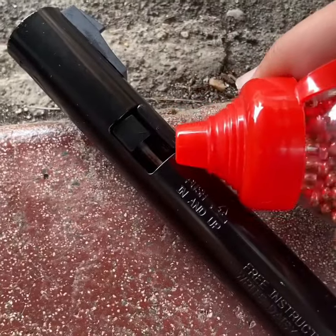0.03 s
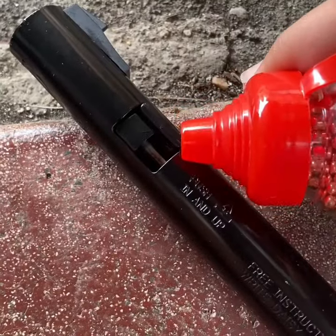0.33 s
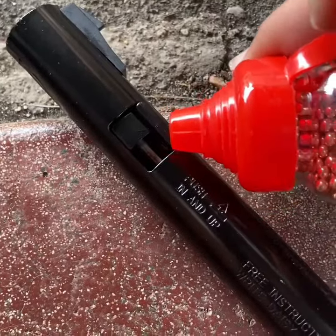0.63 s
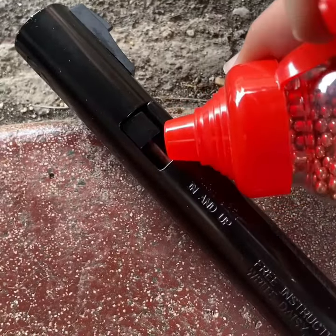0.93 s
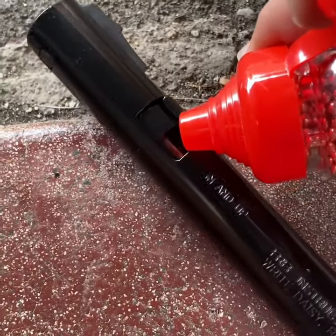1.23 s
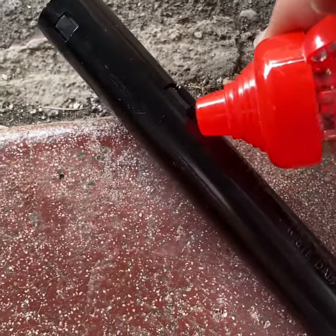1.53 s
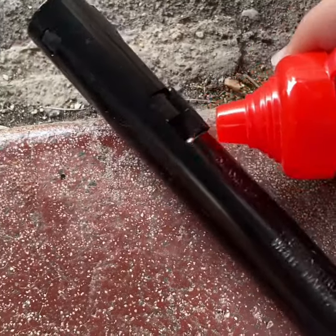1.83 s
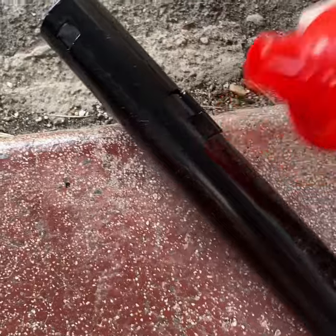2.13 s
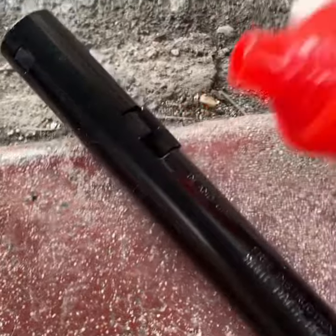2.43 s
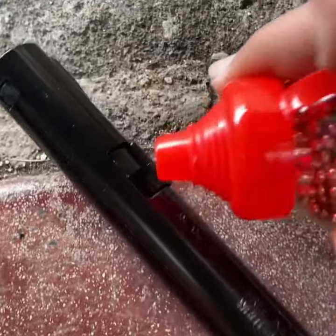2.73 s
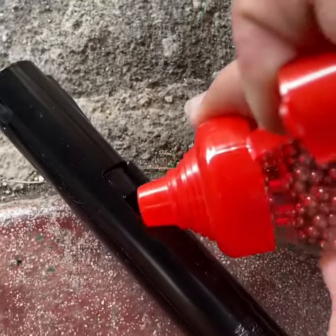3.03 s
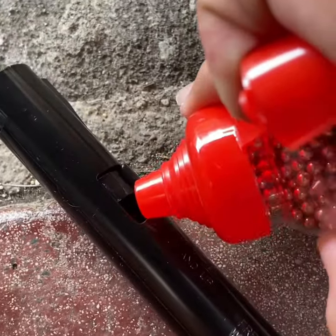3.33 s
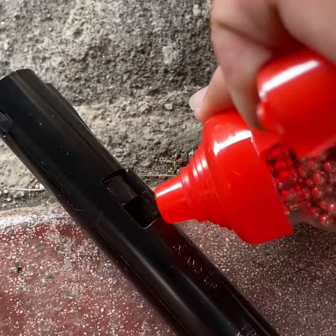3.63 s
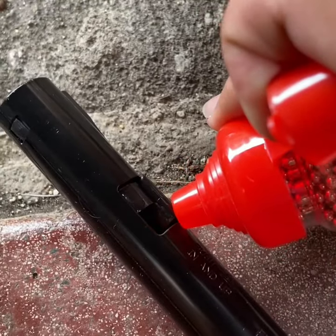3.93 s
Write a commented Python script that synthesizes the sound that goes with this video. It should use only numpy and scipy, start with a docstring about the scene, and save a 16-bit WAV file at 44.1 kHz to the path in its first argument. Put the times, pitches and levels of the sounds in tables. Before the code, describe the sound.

Steel pellets rattle close by from a plastic bottle into an air rifle, thinning to ticks by 0.6 seconds, then pouring again from 1.2 to 1.8. A pellet bounces on steel and the loading port clacks at 2 seconds. Pellets roll back inside the bottle until 2.5, pour from 2.7 to 3.4, then trickle. Underneath, a street rumbles low and a distant engine hums, slowing and fading after 3 seconds.

```python
"""A bright rattle of steel pellets, shaken from a plastic bottle into the loading port of an air rifle,
sounds close by over a low street rumble and a distant engine that hums and slows. Each collision is an
impulse, heard as a sharp tick, that excites a short ring of the bottle and the modes of the barrel tube.
Midway a pellet bounces on steel and the port clacks; then the pellets run again.
A phone's two microphones pick up the scene outdoors."""
import sys
import numpy as np
from scipy import signal
from scipy.fft import rfft, irfft
from scipy.io import wavfile
from scipy.ndimage import uniform_filter1d

SR = 44100
rng = np.random.default_rng(int(sys.argv[2]) if len(sys.argv) > 2 else 0)


def generate_wav(sig):
    """Save sig (samples, or channels by samples) to the path in sys.argv[1] as 16-bit PCM at SR."""
    pcm = np.round(np.clip(np.atleast_2d(sig).T, -1, 1) * 32767).astype(np.int16)
    wavfile.write(sys.argv[1], SR, pcm)


N = 176400
RING_SAMPLES = 4096
IMPACT_GAIN = np.sqrt(.0036 * SR)  # impact levels are energy spread over 3.6 ms


def undb(db):
    """Decibels to amplitude ratio."""
    return 10 ** (np.asarray(db) / 20)


def unit(x):
    """Normalisation to a mean energy of 1 per channel."""
    return x / np.sqrt(np.mean(np.sum(x ** 2, axis=-1)))


def pan(db):
    """Direction by level difference: left and right gains."""
    return undb(np.array([[db], [-db]]) / 2)


def drift(rate_hz):
    """Smoothed random fluctuation with a spread near 1."""
    step = int(SR / rate_hz)
    return uniform_filter1d(np.repeat(rng.standard_normal(N // step + 1), step), step)[:N]


def colour(spectrum, size, tilt_db=0, knee_hz=3580):
    """Spectral envelope: gain per frequency bin, sloped by tilt_db per octave above the knee."""
    f = np.maximum(np.fft.rfftfreq(size, 1 / SR), 1)
    hz, db = np.array(spectrum).T
    return undb(np.interp(np.log(f), np.log(hz), db) + tilt_db * np.log2(np.maximum(f, knee_hz) / 8000))


def noise(spectrum, channels=2):
    """Spectral shaping of white noise: uncorrelated channels of rms 1."""
    white = rng.standard_normal((channels, N))
    return unit(irfft(rfft(white) * colour(spectrum, N), N)) * np.sqrt(N)


def add(out, start_s, sound):
    """Superposition: a sound joins the mix at its start time."""
    start = max(int(start_s * SR), 0)
    part = out[:, start:start + sound.shape[1]]
    part += sound[:, :part.shape[1]]


def decay(t60_s):
    """Damping: an exponential fall of 60 dB in t60_s."""
    return np.exp(-np.log(1000) * np.arange(RING_SAMPLES) / SR / t60_s)


def ring(modes, detune=0.0029):
    """Free vibration: a sum of damped modes, each with its own phase at each microphone."""
    hz, db, t60_s = np.array(modes).T[:, :, None]
    hz = hz * (1 + detune * rng.standard_normal(hz.shape))
    cycles = hz * np.arange(RING_SAMPLES) / SR + rng.random((2, len(hz), 1))
    return unit(np.sum(undb(db) / np.sqrt(t60_s) * decay(t60_s) * np.sin(2 * np.pi * cycles), axis=1))


# phase lead of the left microphone for a collision: frequency_hz, phase_rad
MIC_LEAD = [(0, -2.5), (1200, -1), (2000, 0.07), (2700, -1.5), (4200, -4), (5200, -3), (8300, 0),
            (9500, 1.14), (11300, 0.5), (13000, 3), (14000, 8.5), (16000, 6.5)]


def collision(spectrum, tilt_db, t60_s=.0053, body_db=-4, bands=14):
    """Impulse response of an impact: a sharp pulse, a dense body ring and a faint return from the wall."""
    f = np.fft.rfftfreq(RING_SAMPLES, 1 / SR)
    jitter_s = .000006 * rng.standard_normal()
    lag_rad = np.interp(f, *np.array(MIC_LEAD).T) + 2 * np.pi * f * jitter_s
    body = undb(body_db) * unit(rng.standard_normal(RING_SAMPLES) * decay(t60_s))
    wall = undb(-13) * unit(rng.standard_normal((2, RING_SAMPLES)) * decay(t60_s=0.047))
    heard = (1 + rfft(body)) * np.exp(-1j * lag_rad * np.array([[0], [1]])) + rfft(wall)
    uneven_db = 3.5 * np.interp(f, np.linspace(0, SR / 2, bands), rng.standard_normal(bands))
    # a minimum-phase filter colours the pulse and keeps its onset sharp
    cepstrum = irfft(np.log(colour(spectrum, RING_SAMPLES, tilt_db) * undb(uneven_db)))
    half = RING_SAMPLES // 2
    minimum_phase = np.exp(rfft(2 * cepstrum[:half] * (np.arange(half) > 0), RING_SAMPLES))
    return unit(np.roll(irfft(heard * minimum_phase), 16, axis=1))


# spectra of a pellet collision and of pellets rolling back inside the bottle: frequency_hz, level_db
PELLET = [(300, -21), (1200, -26.5), (1950, -13), (2900, -13.5), (3950, 3.5), (4800, -5.5), (5250, -3.5),
          (6500, -1.5), (8800, -1), (9500, 1.5), (10600, -6.5), (11800, -9), (13500, -10), (15700, -13)]
IN_BOTTLE = [(300, -15), (1200, -21), (2000, -16), (3000, -5.5), (4100, 8), (5500, -21), (6800, -4.5),
             (8000, 1), (9600, 6), (11700, -10), (13800, -10), (15700, -28)]
# modes of the barrel tube: pitch_hz, level_db, t60_s
BARREL_MODES = [(1957, -3.5, 0.042), (2070, -5.5, 0.036), (2308, -7.5, 0.072), (3660, -4.5, 0.0092),
                (4760, -2.5, 0.018), (6500, -2.5, 0.072), (7420, -5, .05), (7470, -1, 0.06),
                (8460, 0, 0.087)]
# flow of each run of pellets: time_s, level_db
FIRST_POUR = [(0, -25), (0.05, -28.5), (0.11, -33.5), (0.18, -30), (0.22, -41), (0.27, -34.5), (0.36, -36),
              (0.41, -60), (0.5, -50), (0.66, -56)]
SECOND_POUR = [(1.1, -55.5), (1.22, -43), (1.3, -40), (1.36, -31), (1.46, -26), (1.58, -31), (1.69, -34),
               (1.76, -49), (1.84, -61)]
ROLL_BACK = [(2.05, -53), (2.12, -49.5), (2.17, -37), (2.3, -27.5), (2.4, -35.5), (2.49, -36), (2.55, -53)]
THIRD_POUR = [(2.6, -50), (2.8, -51.5), (2.88, -57), (2.96, -35), (3.04, -41), (3.1, -38), (3.2, -29),
              (3.3, -40.5), (3.4, -55)]
TRICKLE = [(3.45, -50), (3.6, -54), (3.69, -57), (3.76, -52), (3.88, -48), (3.95, -36.5), (4.0, -36)]
# runs of pellets: flow, spectrum, gain_db, tilt_db_per_octave, barrel_db, full_flow_hits_per_s
PELLET_RUNS = [(FIRST_POUR, PELLET, 0.69, -1.8, -6, 830), (SECOND_POUR, PELLET, 0.57, 0.43, -6, 980),
               (ROLL_BACK, IN_BOTTLE, 0.39, 0, -16, 2200), (THIRD_POUR, PELLET, -0.25, -2.7, -11.5, 1400),
               (TRICKLE, PELLET, -1.2, -1.5, -12, 2200)]


def pellet_rattle(flow, spectrum, gain_db, tilt_db, barrel_db, hits_per_s, full_flow_db=-24.5, kinds=20):
    """Shot noise: random collisions, denser and harder as the flow of pellets grows."""
    time_s, level_db = np.array(flow).T
    t = np.arange(time_s[0], time_s[-1], 1 / SR)
    flow_db = np.interp(t, time_s, level_db)
    chance = hits_per_s * undb(flow_db - full_flow_db) ** 0.54 / SR
    struck = rng.random(N)[:len(t)] < chance
    kind = rng.integers(0, kinds, N)[:len(t)]
    strength = undb(5.2 * np.minimum(rng.standard_normal(N)[:len(t)], 2))
    hits = struck * strength / np.sqrt(np.mean(strength ** 2) * chance) * undb(flow_db + gain_db)
    out = np.zeros((2, N))
    for k in range(kinds):
        tick = collision(spectrum, tilt_db + 0.53 * rng.standard_normal(), t60_s=.007, body_db=0)
        response = tick + undb(barrel_db) * ring(BARREL_MODES)
        add(out, time_s[0], signal.fftconvolve((hits * (kind == k))[None], response, axes=1))
    return out


# spectra of the street's rumble and of the hiss in the air: frequency_hz, density_db
RUMBLE_SPECTRUM = [(20, -52), (33, -33), (44, -6), (54, 2), (72, -10), (100, -1.5), (150, -11.5), (230, -9),
                   (310, -17.5), (450, -24), (700, -37), (1500, -81)]
AIR_SPECTRUM = [(100, -10), (400, 8.5), (700, 3.5), (1000, 5), (1500, -1), (2500, -6), (4500, -17),
                (8000, -18), (15000, -30)]
# envelope of the rumble: time_s, level_db
RUMBLE_ENVELOPE = [(0, -31.5), (.5, -33.5), (1.15, -34), (1.299, -30.5), (1.45, -35), (2.4, -36.5),
                   (3.3, -36), (3.6, -37.5), (4, -36.5)]


def street(drone_hz=54.58, air_width=0.94):
    """Coherence sets width: rumble and a wavering drone reach both sides in phase; the hiss is diffuse."""
    mid, side = noise(AIR_SPECTRUM)
    air = (mid + air_width * side * np.array([[1], [-1]])) * pan(db=1)
    wavering_hz = drone_hz * (1 + 0.063 * drift(rate_hz=13))
    drone = np.sqrt(2) * np.sin(2 * np.pi * np.cumsum(wavering_hz) / SR)
    rumble_db = np.interp(np.arange(N) / SR, *np.array(RUMBLE_ENVELOPE).T)
    rumble = undb(rumble_db) * noise(RUMBLE_SPECTRUM, channels=1)
    return (rumble + undb(-46.5) * drone) * pan(db=3) + undb(-50) * air


# the engine's firing rate and its harmonics: time_s, firing_hz, second_db, third_db, fourth_db
ENGINE_HARMONICS = [(0.0, 80.85, -50, -29, -58), (0.272, 87.5, -50, -32.5, -51),
                    (0.55, 71.05, -29.5, -26.5, -51), (0.71, 68.06, -27.5, -51.5, -42.5),
                    (0.95, 66.05, -27, -35.5, -38.5), (1.05, 65.1, -23, -49.5, -37.5),
                    (1.171, 66.8, -24.5, -48.5, -50.5), (1.2, 66.76, -28, -48, -34),
                    (1.38, 68.5, -23, -37, -39.5), (1.58, 67.55, -23, -39, -47),
                    (1.81, 67.05, -25, -64, -57), (1.87, 64.92, -25.5, -70, -57),
                    (1.94, 65.53, -33, -39, -40.5), (2.132, 65.22, -31, -46, -44),
                    (2.34, 61.95, -41.5, -47, -36), (2.41, 64.3, -27.5, -44, -61),
                    (2.64, 62.56, -25.5, -39, -33.5), (2.928, 64.58, -30, -72, -42),
                    (3.12, 59.8, -26.5, -44, -40), (3.21, 55.2, -33, -42, -38.5),
                    (3.3, 53.9, -44, -53, -43)]


def distant_engine(waver=.006, flutter_db=1.92, fade_s=0.32):
    """Periodic firing makes a harmonic series; only its low end carries this far, slowing and fading."""
    t = np.arange(N) / SR
    time_s, *columns = np.array(ENGINE_HARMONICS).T
    firing_hz, second_db, third_db, fourth_db = (np.interp(t, time_s, column) for column in columns)
    phase = 2 * np.pi * np.cumsum(firing_hz * (1 + waver * drift(rate_hz=15))) / SR
    hum = np.zeros(N)
    for harmonic, db in [(2, second_db), (3, third_db), (4, fourth_db), (1, -45), (6, second_db - 30.5)]:
        amplitude = np.sqrt(2) * undb(db + flutter_db * drift(rate_hz=20))
        hum += amplitude * np.sin(harmonic * phase + 2 * np.pi * rng.random())
    fade_out = np.exp(-np.maximum(t - time_s[-1], 0) / fade_s)
    return undb(-0.2) * hum * fade_out * pan(db=2.2)


# single pellet impacts that stand out of the rattle: start_s, level_db, tilt_db_per_octave
PELLET_IMPACTS = [(0.0187, -19, 2), (0.055, -21, 1), (0.1285, -22.5, -12), (0.1378, -14.5, 3),
                  (0.163, -18, -5.5), (0.181, -21.5, 0), (0.1857, -22, -4), (0.2355, -24.5, -3),
                  (0.253, -23, -7), (0.2684, -23.5, -3), (0.2914, -30, -6), (0.3084, -25, -5),
                  (0.3177, -22.5, -6), (0.326, -25, -5), (0.3327, -27, -5), (0.345, -27, -2),
                  (0.358, -36, -4), (0.3719, -30, -6), (0.4334, -36, -8), (0.46, -31.5, -5),
                  (0.4734, -28, -2), (0.4864, -23, 1), (0.497, -32, -3), (0.507, -29, -4),
                  (0.515, -25.5, -1), (0.5685, -22.5, 2), (0.5717, -27, 4), (0.5859, -31.5, -5),
                  (0.613, -48, -8), (0.6253, -33.5, -10), (0.9013, -38, -1), (1.2165, -32.5, -24),
                  (1.2274, -26, -16), (1.2372, -27, -4), (1.328, -17, -2), (1.345, -29, 1),
                  (1.3678, -23, 9), (1.3912, -14.5, 0), (1.4112, -18.5, 4), (1.4172, -14, 1.5),
                  (1.485, -25, 7), (1.4915, -24, 7), (1.498, -19.5, 4), (1.504, -23, 0), (1.552, -29, 6),
                  (1.6098, -36, 6.0), (1.6231, -22, 1.5), (1.6471, -26, 7), (1.6831, -13.5, 6),
                  (1.6995, -26.5, 0), (1.7703, -24, 4), (1.774, -35, 5), (1.8161, -34, 0),
                  (2.1558, -17, 1.5), (2.1904, -18.5, 6), (2.2045, -38, 7), (2.2082, -31, -4),
                  (2.2268, -24, 9), (2.281, -18, 8), (2.301, -35, 5), (2.3042, -30, 11), (2.351, -21.5, 7),
                  (2.3868, -37, 8), (2.4065, -16.5, 13.5), (2.4213, -26, -7), (2.453, -29, -1),
                  (2.486, -21, 4), (2.4892, -41, 10), (2.5083, -27.5, -1.5), (2.5852, -39, -4),
                  (2.7212, -27, -5.5), (2.7378, -36.5, -1), (2.7697, -32, 4.0), (2.774, -31.5, 5),
                  (2.7855, -21, 1), (2.8153, -28, 4), (2.8452, -27, 2), (2.8598, -32, -7),
                  (2.8698, -22.5, 0), (2.8809, -25, 0), (2.8897, -26, 2), (2.9022, -31, -3),
                  (2.919, -27, -3), (2.926, -20, 0), (2.9303, -19, 6), (2.934, -21.5, -1),
                  (2.9582, -24.5, 3), (2.9649, -19, 2.5), (2.979, -28, -1), (2.9865, -26, -5),
                  (3.0849, -18.5, 3), (3.1027, -22, 2), (3.1102, -16, 2.5), (3.1517, -25.5, 12),
                  (3.166, -21, 9), (3.2092, -21.5, 1), (3.223, -32, -13), (3.291, -26.5, 4),
                  (3.3003, -27.5, -1), (3.3051, -36, -6), (3.3246, -22, -2), (3.3285, -23, 10),
                  (3.3523, -29, -1.5), (3.5678, -33.5, 0), (3.5974, -34, -21), (3.603, -34, 9),
                  (3.6268, -31.5, -9.5), (3.6492, -33.5, -3), (3.7374, -29.5, 4), (3.778, -27, -2),
                  (3.816, -32, 0), (3.8196, -26.5, -5), (3.8298, -35, -3.0), (3.869, -26.5, -3.5),
                  (3.8996, -28.5, 9), (3.9033, -22, -9), (3.9528, -26.5, -9)]


def pellet_ticks(knocks=3, knock_spread_s=.002, knock_db=-9):
    """Momentum transfer: a struck pellet ticks, rings the barrel faintly and knocks its neighbours."""
    out = np.zeros((2, N))
    for start_s, level_db, tilt_db in PELLET_IMPACTS:
        tick = undb(level_db - 2) * (collision(PELLET, tilt_db) + undb(-26) * ring(BARREL_MODES))
        add(out, start_s, tick)
        for delay, strength in rng.standard_normal((knocks, 2)):
            knock = undb(knock_db + 3.7 * strength) * tick / np.sqrt(knocks)
            add(out, start_s + knock_spread_s * abs(delay), knock)
    return IMPACT_GAIN * out


# bounces of a pellet on steel: start_s, level_db
BOUNCES = [(1.8753, -16), (1.8921, -22.5), (1.901, -21)]
# modes of the struck steel: pitch_hz, level_db, t60_s
STEEL_MODES = [(4550, -15, 0.0065), (7520, -12, 0.04), (9800, -15, .015), (13000, -5, 0.01),
               (14090, -13, .012), (13800, 3.5, 0.025), (14500, -3, 0.011), (14900, -3, 0.01)]


def pellet_bounce():
    """Elastic rebound: each contact gives a bright tick and excites the high modes of the steel."""
    out = np.zeros((2, N))
    for start_s, level_db in BOUNCES:
        ping = ring(STEEL_MODES) + undb(-8.5) * collision(PELLET, tilt_db=8.0)
        add(out, start_s, undb(level_db) * ping)
    return IMPACT_GAIN * out


# blows of the loading port: start_s, level_db
PORT_BLOWS = [(1.9858, -18.5), (1.9881, -15), (1.9929, -12), (1.9938, -14.5), (1.999, -22.5),
              (2.0028, -19.5)]
# modes of the port: pitch_hz, level_db, t60_s
PORT_MODES = [(381, 5, 0.08), (1698, -5, .04), (2044, -3, 0.1), (2560, -6, 0.06), (3854, 2.5, 0.11),
              (4530, 0, .025), (5500, -19, .02), (7200, 5, 0.018), (10300, 1, .015)]
# spectrum of the port's body: frequency_hz, level_db
PORT_SPECTRUM = [(200, -10), (380, 6), (550, -12), (1200, -24), (2000, -3.5), (3100, -8.5), (4300, 4),
                 (5800, -5.5), (7400, 0), (10000, 5.5), (12000, -11), (13500, -3), (15700, -10)]


def port_clack():
    """Temporal fusion: blows milliseconds apart ring the port and are heard as one clack."""
    out = np.zeros((2, N))
    for start_s, level_db in PORT_BLOWS:
        modes = undb(-10) * ring(PORT_MODES)
        body = undb(-2.5) * collision(PORT_SPECTRUM, tilt_db=0, t60_s=0.09, body_db=21)
        add(out, start_s, undb(level_db) * (modes + body))
    return IMPACT_GAIN * out


def scene():
    """Superposition of sources: pellets and rifle in front, street and engine behind."""
    out = street() + distant_engine() + pellet_ticks() + pellet_bounce() + port_clack()
    return out + sum(pellet_rattle(*run) for run in PELLET_RUNS)


# sensitivity of the left microphone over the right: frequency_hz, difference_db
LEFT_OVER_RIGHT = [(500, 0.5), (1200, -1), (1900, -3.5), (3100, -1.5), (4000, 2.9), (4900, -5.5), (5700, 0)]


def record(dry, cutoff_hz=15750):
    """Frequency response: the two microphones favour different bands; the phone cuts the top treble."""
    ratio = colour(LEFT_OVER_RIGHT, N)
    sides = np.array([ratio, np.ones_like(ratio)]) * np.sqrt(2 / (1 + ratio ** 2))  # constant power
    lowpass = signal.ellip(8, .2, 70, cutoff_hz, fs=SR, output="sos")
    return signal.sosfilt(lowpass, irfft(rfft(dry) * sides, N))


dry = scene()
out = record(dry)
generate_wav(out)
```